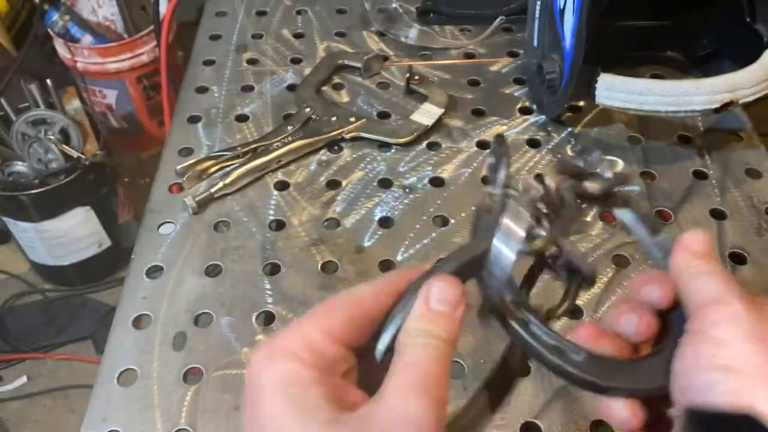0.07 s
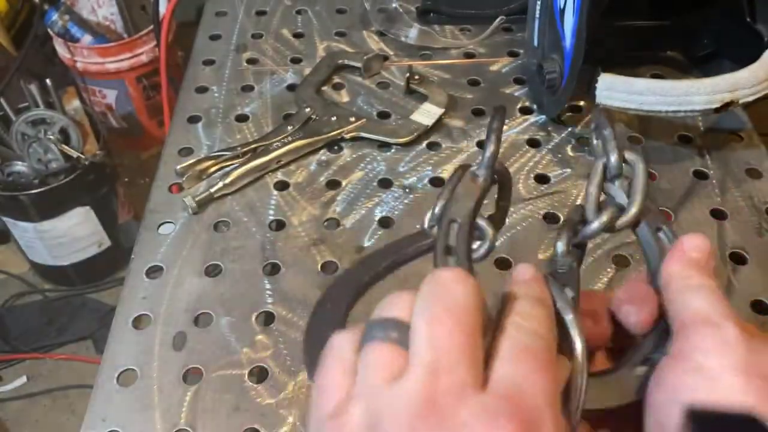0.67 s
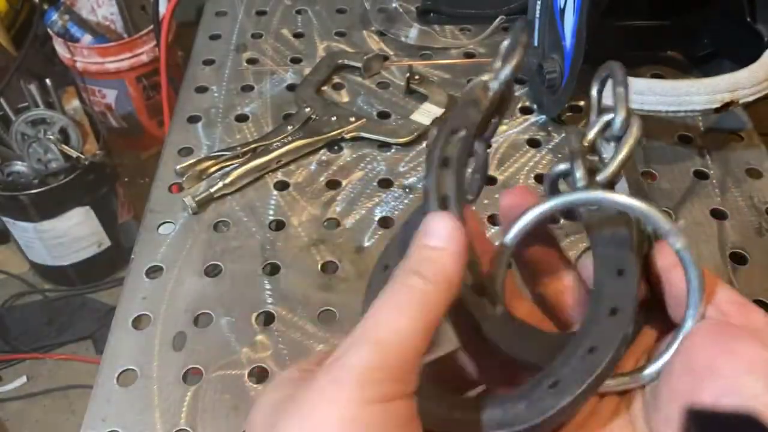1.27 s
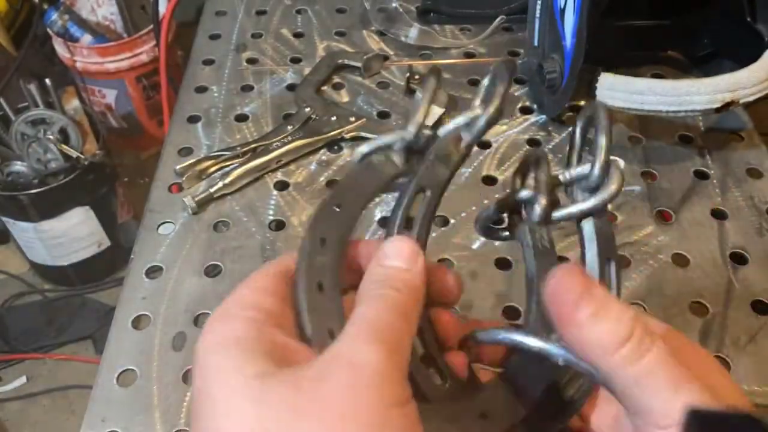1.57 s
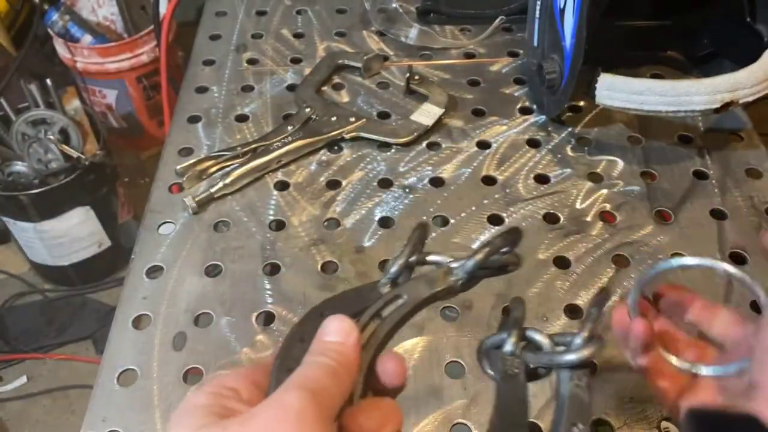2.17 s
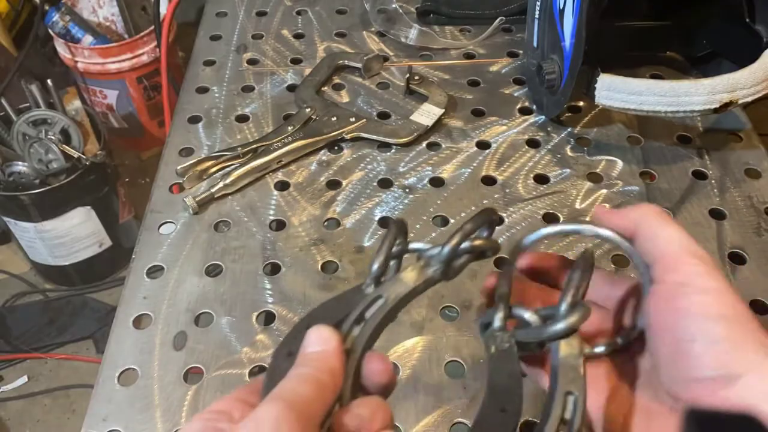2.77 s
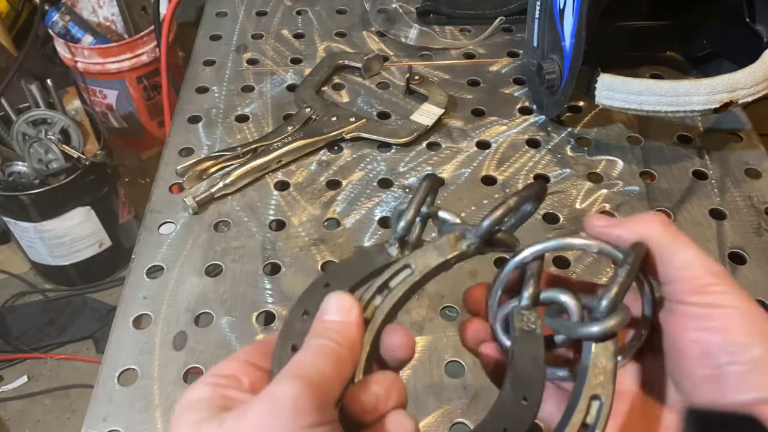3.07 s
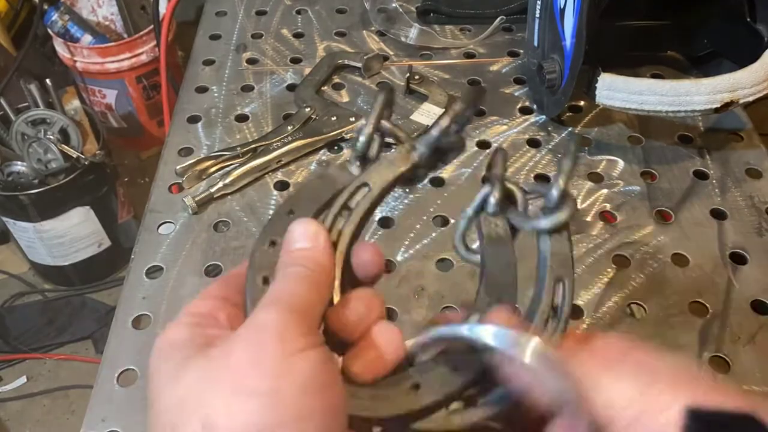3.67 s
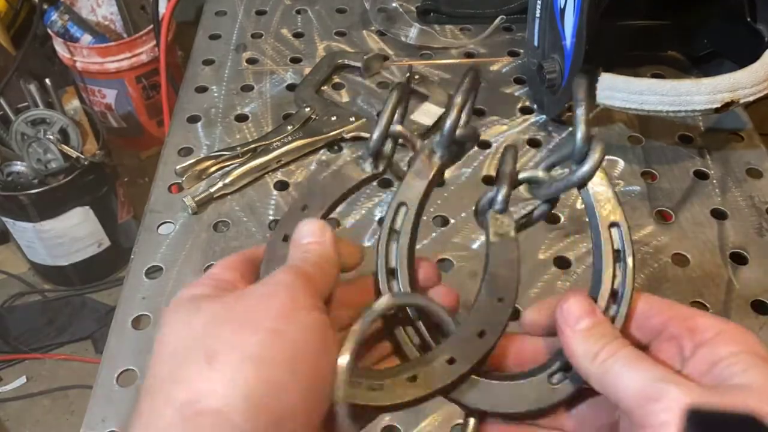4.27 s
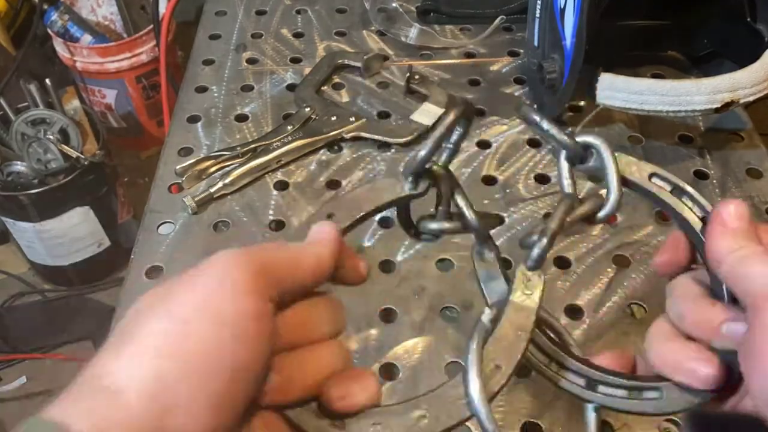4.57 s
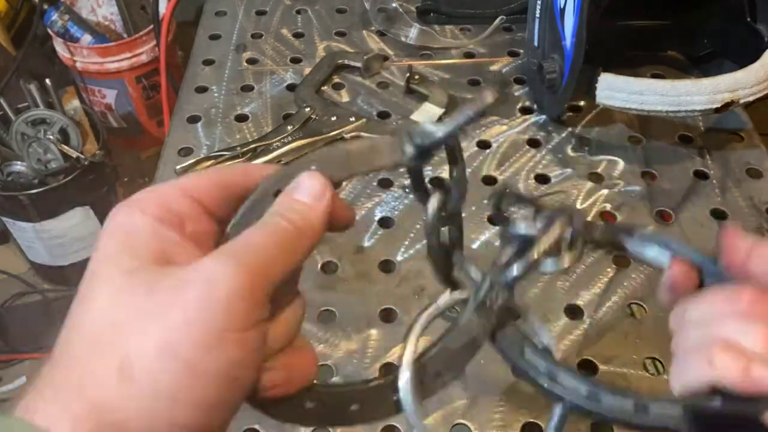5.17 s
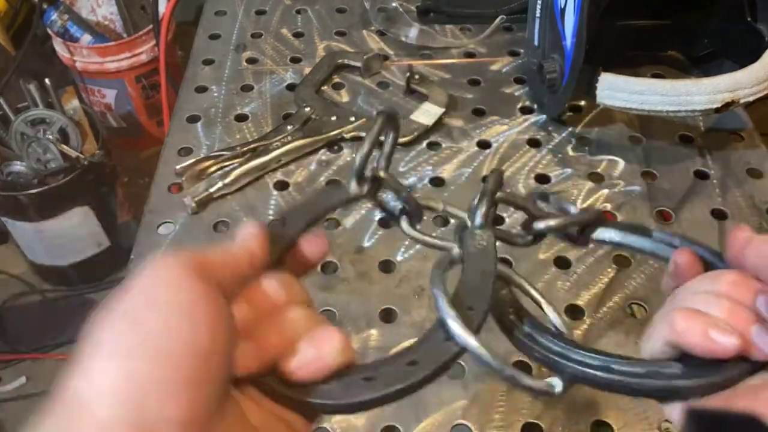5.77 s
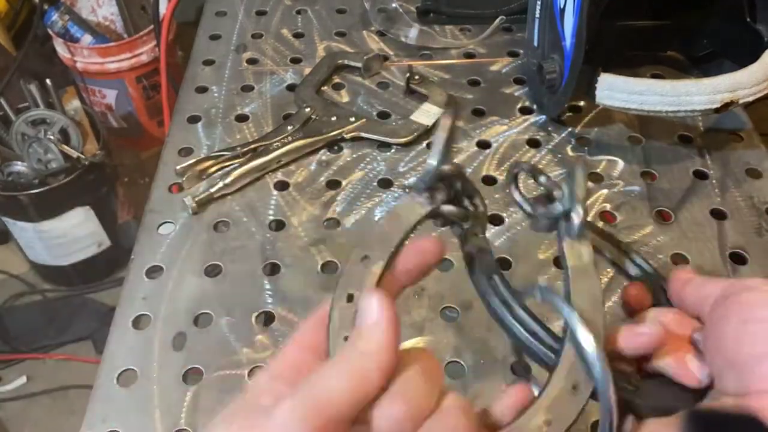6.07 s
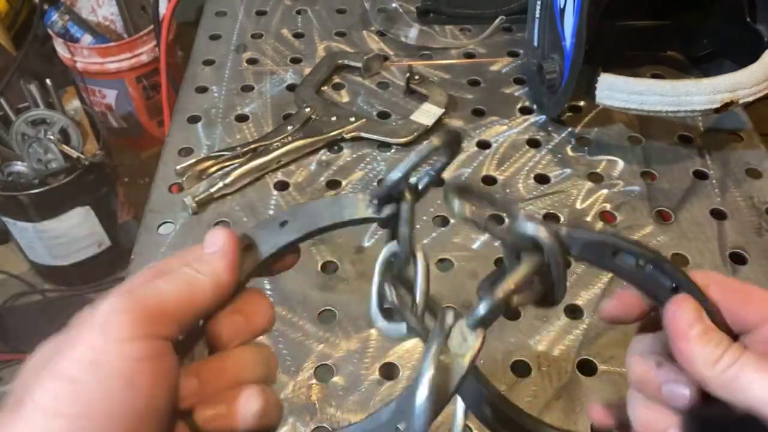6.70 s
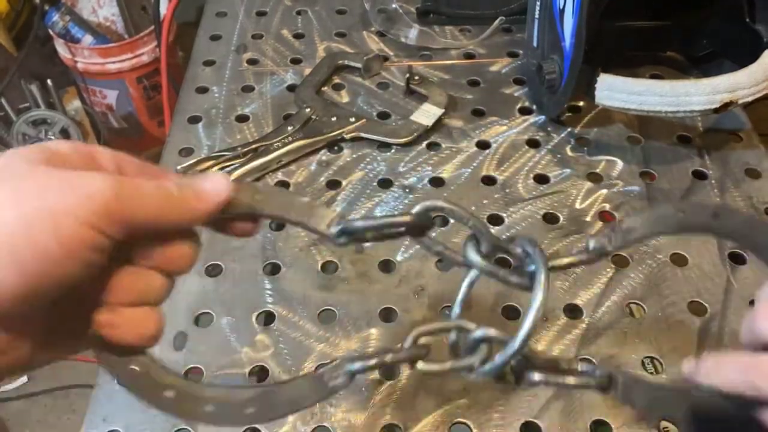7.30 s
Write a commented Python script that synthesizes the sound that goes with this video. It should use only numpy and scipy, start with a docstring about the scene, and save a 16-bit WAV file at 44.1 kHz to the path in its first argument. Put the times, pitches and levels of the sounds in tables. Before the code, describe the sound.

Bright, irregular clinks and brief scrapes of chained horseshoes turned in the hands, growing louder late, with soft air and hum behind.

```python
"""Two steel horseshoes, joined by short chains and carrying a ring, are turned in the hands close by.
The parts clink, bounce and slide on each other. Each hit makes the steel crack and ring,
and the fingers damp it. The chains jerk taut with a dull thud, and a limiter turns everything
down for a moment at the loudest hits. Behind it all, air rushes and a fan hums in the workshop."""
import sys
import numpy as np
from scipy import signal
from scipy.fft import rfft, irfft
from scipy.io import wavfile
from scipy.ndimage import uniform_filter1d, minimum_filter1d

SR = 44100
rng = np.random.default_rng(int(sys.argv[2]) if len(sys.argv) > 2 else 0)


def pcm_store(signal):
    """Save signal as 16-bit PCM."""
    levels = np.round(np.clip(np.atleast_2d(signal), -1, 1) * 32767)
    wavfile.write(sys.argv[1], SR, levels.astype(np.int16).T)


N = 323694
TAIL = 16384  # samples in one dying sound

# Tone colour of the workshop air: pitch_hz, relative_db
AIR_COLOUR = [(26, -18.5), (56, -5), (180, -2.5), (330, -3.5), (560, -9.5), (1050, -14.5), (2100, -20),
              (4100, -25.5), (6500, -26), (8100, -40.5), (11000, -46.5), (12200, -70), (16100, -49.5)]
# How wide the air sounds: pitch_hz, side_minus_mid_db
AIR_WIDTH = [(62, -13.5), (252, -5), (402, -9), (602, 4.5), (1102, 4), (2502, 0)]
# Clinks (harder hits tilt toward the treble): start_s, level_db, tilt_db_per_octave, links_relative_db
CLINK_HITS = [(0.0371, -23, -2.5, -4.5), (0.112, -23, 4, 0), (0.131, -26, 2.5, -14),
              (0.1585, -25.5, 0.5, -6), (0.205, -24, -0.5, -10), (0.26, -29.5, -3.5, 3),
              (0.3215, -23.5, -2, -2), (0.4255, -19.5, -5, -3), (0.5806, -24.5, 8, 13),
              (0.669, -26, 2.5, 0), (0.7266, -32.5, -1, -10), (0.8121, -22, 1.5, -5),
              (0.8444, -30.5, -0.5, 0), (1.037, -14, -1.5, -2.5), (1.3596, -30.5, 2, -10),
              (1.3869, -20.5, .5, -8.5), (1.5323, -25, -2.5, -14), (1.7613, -35, -2, -15),
              (1.861, -20, 3.5, -17), (1.8877, -20.5, 4, 8.5), (1.9352, -32, -2.5, -18),
              (2.0261, -25.5, -0.5, -17), (2.8157, -17.5, 5.5, -6.5), (2.851, -21.5, 2, 2),
              (2.9242, -38.5, .5, -22), (3.079, -31, 4.5, 1), (3.138, -34, 3.5, -23),
              (3.1656, -28.5, 4.5, -9), (3.3553, -38.5, -6, -12), (3.4406, -40, -2, -15),
              (3.6212, -32, -3.5, -5), (3.7042, -16.5, 0, -5), (3.9833, -34, -5.5, -16),
              (4.2177, -31.5, -2, -17), (4.3407, -17.5, 5, -6), (4.4209, -16.5, 5.5, -5),
              (4.5262, -28.5, -3.5, 1), (4.6158, -30, -5, -16), (4.7992, -35, -9, -17),
              (4.929, -42.5, -1, -12), (5.0146, -29, -8, -6), (5.046, -17.5, -1.5, -9),
              (5.072, -12, -5, -3.5), (5.1717, -14.5, -2, -2.5), (5.2, -24.5, -1.5, 3),
              (5.301, -31.5, -7.5, -16), (5.436, -28, -4, -9), (5.554, -25.5, -2.5, 6),
              (5.602, -23.5, -4.5, -5), (5.669, -18, 2.5, 2.5), (5.742, -25, 3, -12), (5.7773, -22.5, 5, 2),
              (5.809, -27, -1.5, -19), (5.879, -17, .5, -3), (5.995, -31, 0, -7),
              (6.0569, -30.5, -1.5, 1.5), (6.113, -23, -1.5, -10), (6.179, -19, 0, -7.5),
              (6.2047, -8.5, -2, 5), (6.6227, -24.5, 2, -6), (6.6889, -22, -3.5, -17),
              (6.7384, -19.5, 0.5, -8), (6.854, -24.5, -2.5, -8), (6.8785, -13, 0, -2),
              (6.9094, -6.5, 0.5, -2.5), (6.9508, -7.5, 1, 8.5), (7.0001, -6, 2, -1), (7.2626, -37, -1, -9)]
# Steel sliding on steel: start_s, end_s, level_db, tilt_db_per_octave, links_relative_db
SLIDE_STROKES = [(0.421, 0.7, -31.5, -5.5, -2), (0.471, 0.537, -25, -1, 8.5),
                 (0.931, 0.975, -43.5, -3.5, -14), (1.611, 1.676, -36, 2.5, 0.5),
                 (1.783, 1.836, -30.5, -0.5, -9), (2.03, 2.116, -37.5, -2.5, -2),
                 (4.357, 4.513, -33.5, -2.2, 0), (4.634, 4.686, -42, -11, -24), (5.012, 5.2, -29, -2.5, -3),
                 (5.683, 5.867, -36.5, -4, 8), (6.121, 6.232, -31, -5, -9), (6.651, 6.842, -32.5, 4.5, 5),
                 (6.879, 7.061, -20, -0.5, 3)]
# The notes that each steel part rings with: pitch_hz, relative_db
RING_NOTES = [(2322, 4), (2432, 11.5), (2542, 0.5), (5342, -6.5), (6953, 9.5), (7793, 15), (7943, -3),
              (8546, -1), (9666, 10), (11001, -6)]
FIRST_SHOE_NOTES = [(2090, -3), (2779, -7), (2902, -5.5), (3815, -3.5), (4352, -2.5), (4777, -4), (5424, 5),
                    (5589, -4.5), (6952, 4), (7752, -5.5), (9417, 5.5), (9652, 8.5), (10682, -8)]
SECOND_SHOE_NOTES = [(2554, -9.5), (3730, 4), (4416, 5.5), (4758, 7.5), (5603, 2.5), (6696, 4.5), (7377, 6),
                     (7492, -22.5), (8227, -23.5), (8747, -6), (9394, -2.5), (9952, -0.5), (10402, -12),
                     (11032, -3.5)]
LINK_NOTES = [(13357, -13.5), (13610, -1), (13714, 0.5), (13877, -1.5), (14623, 6.5), (14782, -9.5),
              (14878, -10.5)]
# Tone colour of the short crack of a hit, on the large parts and on the links: pitch_hz, relative_db
BODY_CRACK_COLOUR = [(320, -26), (1220, -14), (1770, -14), (2420, -3.5), (3320, -4.5), (4620, 5.5),
                     (6220, -1.5), (7220, -0.5), (11020, 1.5), (12020, -31.5), (16020, -41)]
LINK_CRACK_COLOUR = [(11600, -51), (13020, -29), (13720, -9), (14920, 5.5), (15620, -21.5), (16420, -40)]
# Which part is hit: time_s, part (0 ring, 1 first shoe, 2 second shoe, in between = both)
STRUCK_PART = [(0.15, 0.39), (0.66, .5), (0.8, 1.48), (1.53, 1.7), (1.82, 1.06), (2.05, 0.61), (2.82, 0.92),
               (3.08, .4), (3.7, 0.99), (4.42, 1.31), (4.53, 2), (5.05, 1.5), (5.43, 1.68), (5.66, 0.74),
               (5.76, 1.58), (5.9, 1.38), (6.85, 1.65), (7.05, 1.56)]
# How long the fingers let the steel ring, until it is 60 dB down: time_s, ring_s
FINGER_GRIP = [(0.048, 0.059), (0.42, 0.2), (0.8, 0.073), (1.4, 0.17), (1.9, 0.039), (2.051, 0.24),
               (2.85, 0.08), (3.16, 0.023), (3.4, 0.15), (3.72, 0.071), (4.42, 0.11), (4.56, 0.012),
               (5.43, 0.036), (5.6, 0.12), (6.05, 0.023), (6.9, 0.13), (7.26, 0.0093)]


def amp(db):
    """Turn decibels into a gain."""
    return 10 ** (np.asarray(db) / 20)


def unit_level(x):
    """Scale a sound to an average power of 1."""
    return x / np.sqrt(np.mean(x ** 2) + 1e-20)


def curve_at(points, hz):
    """Read a spectrum between its points, along a log pitch scale."""
    pitch_hz, db = np.transpose(points)
    return np.interp(np.log(hz + 1), np.log(pitch_hz + 1), db)


def add(mix, start_s, sound):
    """Mix a sound in at its start time."""
    part = mix[:, max(round(start_s * SR), 0):][:, :sound.shape[1]]
    part += sound[:, :part.shape[1]]


def noise(db, size):
    """Two unrelated channels of noise with the spectrum db."""
    return irfft(rfft(rng.standard_normal((2, size))) * amp(db), size)


def fade(ring_s):
    """A fade that falls 60 dB in ring_s seconds."""
    return amp(-60 * np.arange(TAIL) / SR / max(ring_s, 1e-3))


def workshop_air(level_db=-48):
    """Air makes a soft, wide rush: mid is what both ears share, side is how they differ."""
    hz = np.fft.rfftfreq(N, 1 / SR)
    mid, side = noise(curve_at(AIR_COLOUR, hz), N)
    side = irfft(rfft(side) * amp(curve_at(AIR_WIDTH, hz)), N)
    return amp(level_db) * np.array([mid + side, mid - side]) / mid.std()


def fan(pitch_hz=398.3, level_db=-49, waver=0.047, drift_hz=4, stereo_shift_rad=0.98):
    """Turning fan blades hum one slightly wavering note."""
    hz = np.fft.rfftfreq(N, 1 / SR)
    drift = unit_level(noise(-20 * np.log10(1 + (hz / drift_hz) ** 2), N))
    phase = 2 * np.pi * pitch_hz * np.arange(N) / SR + waver * drift[0]
    loudness = amp(level_db) * np.sqrt(2) * (1 + waver * drift[1])
    return loudness * np.sin([phase, phase + stereo_shift_rad])


def steel(notes):
    """Steel vibrates at its own notes: their pitches, levels and never-fading waves."""
    hz, db = np.transpose(notes)
    return hz, db, np.exp(2j * np.pi * hz[:, None] * np.arange(TAIL) / SR)


def hands(time_s):
    """The hands decide which part is hit and how long it rings."""
    return [np.interp(time_s, *np.transpose(curve)) for curve in (STRUCK_PART, FINGER_GRIP)]


def strike(metal, weight_db, crack_colour, tilt, ring_s, crack_db, spread_rad, after_db, free_ring_s=0.32):
    """Struck steel gives a noisy crack, notes damped by the fingers, and a faint free after-ring."""
    hz, db, waves = metal
    uneven_db = 2.2 * rng.standard_normal((2, len(hz)))
    # each note spreads in its own pattern, so it reaches left and right out of step
    phase = 2 * np.pi * rng.random(len(hz)) + spread_rad * rng.standard_normal((2, len(hz)))
    spot_db = 7.0 * rng.standard_normal(len(hz))  # the spot that is hit favours some notes
    gain = amp(db + weight_db + tilt * np.log2(hz / 6000) + uneven_db + spot_db)
    tone = unit_level(((gain * np.exp(1j * phase)) @ waves).real)
    # touching parts load each other, which shifts the pitch a little
    n = np.arange(TAIL)
    detuned = n * (1 + 0.0037 * rng.standard_normal())
    tone = np.array([np.interp(detuned, n, channel) for channel in tone])
    ringing = tone * (fade(ring_s) + amp(after_db) * fade(free_ring_s))
    crack_hz = np.fft.rfftfreq(TAIL, 1 / SR)
    hardness_db = tilt * np.log2(np.maximum(crack_hz, 1900) / 6000)
    crack = noise(curve_at(crack_colour, crack_hz) + hardness_db, TAIL)
    crack = unit_level(crack + 0.055 * crack[::-1]) * fade(1.26 * ring_s)  # left and right blend a little
    swell = 1 - np.exp(-n / SR / 0.00028)  # the vibration spreads through the steel
    return swell * (ringing + amp(crack_db) * crack)


def contact(parts, force, energy, tilt, link_db, part, ring_s, neighbour_db=-24.5):
    """A force shakes the struck part, its neighbours more weakly, and the chain links."""
    large, links, part_of_note = parts
    weight_db = neighbour_db * abs(part_of_note - np.clip(part, 0, 2))
    body = strike(large, weight_db, BODY_CRACK_COLOUR, tilt, ring_s,
                  crack_db=-4.5, spread_rad=1.0, after_db=-58.5)
    chain = strike(links, 0, LINK_CRACK_COLOUR, 0, ring_s, crack_db=-19.0, spread_rad=0.7, after_db=-48)
    body, chain = (unit_level(signal.fftconvolve(x, force[None], axes=1)) for x in (body, chain))
    return np.sqrt(energy * SR / body.shape[1]) * (body + amp(link_db) * chain)


def clinks(parts, bounce=0.44, bounce_s=0.005, bounces=3, graze=0.11, graze_s=0.0037, blow_s=0.0072):
    """The parts graze, hit and bounce a few times, and ring as long as the fingers allow."""
    out = np.zeros((2, N))
    for start_s, level_db, tilt, link_db in CLINK_HITS:
        gaps_s = np.r_[graze_s, bounce_s * (0.5 + rng.random(bounces))]  # the hit, then its bounces
        force = np.zeros(SR // 20)
        hits = np.clip(np.cumsum(gaps_s) * SR, 1, len(force) - 1).astype(int)
        force[hits] = bounce ** np.arange(len(hits))
        force[0] = graze
        energy = amp(level_db) ** 2 * blow_s  # as if the level were held for blow_s
        add(out, start_s - graze_s, contact(parts, force, energy, tilt, link_db, *hands(start_s)))
    return out


def loose_links(parts, level_db=-48, ring_s=0.11, count=20):
    """Loose links touch the other parts faintly at random moments."""
    out = np.zeros((2, N))
    for when, which, strength in rng.random((count, 3)):
        energy = strength * amp(level_db) ** 2 * ring_s / np.log(1e6)  # summed over the fade
        touch = contact(parts, np.ones(1), energy, tilt=0, link_db=-8, part=2 * which, ring_s=ring_s)
        add(out, when * N / SR, touch)
    return out


def slides(parts, slips_per_s=330, scatter_db=4.0, ring_s=0.031):
    """Sliding steel catches and slips in many tiny hits that swell and fade with the stroke."""
    out = np.zeros((2, N))
    for start_s, end_s, level_db, tilt, link_db in SLIDE_STROKES:
        part, _ = hands((start_s + end_s) / 2)
        length = int(np.clip((end_s - start_s) * SR, SR // 100, SR))
        slips = rng.random(SR)[:length] < slips_per_s / SR
        strength = amp(scatter_db * rng.standard_normal(SR)[:length])
        force = slips * strength * np.sqrt(np.hanning(length))
        energy = amp(level_db) ** 2 * length / SR * 2 / np.pi
        add(out, start_s, contact(parts, force, energy, tilt, link_db, part, ring_s))
    return out


def chain_jerk(start_s=6.213, pitch_hz=86, level_db=-18, ring_s=0.059):
    """The chain snaps taut and the hands take a dull thud."""
    out = np.zeros((2, N))
    thud = amp(level_db) * np.sin(2 * np.pi * pitch_hz * np.arange(TAIL) / SR) * fade(ring_s)
    add(out, start_s, np.array([thud, thud]))
    return out


def room_echo(sound, ring_s=0.19, build_s=0.022):
    """The room adds a short wash of echoes, duller than the sound and different on each side."""
    t = np.arange(TAIL) / SR
    colour_db = curve_at([(4200, 2), (14200, -4.0)], np.fft.rfftfreq(TAIL, 1 / SR))
    build_up = 1 - np.exp(-(t / build_s) ** 2)
    echoes = unit_level(noise(colour_db, TAIL) * fade(ring_s) * build_up)
    return signal.fftconvolve(sound, echoes / np.sqrt(TAIL), axes=1)[:, :N]


def scene():
    """Mix the steel, its echo, the thud, the air and the fan."""
    large = [RING_NOTES, FIRST_SHOE_NOTES, SECOND_SHOE_NOTES]
    part_of_note = np.concatenate([np.full(len(notes), part) for part, notes in enumerate(large)])
    parts = steel(np.concatenate(large)), steel(LINK_NOTES), part_of_note
    metal = clinks(parts) + slides(parts) + loose_links(parts)
    direct = metal * amp([[0.4], [-0.4]])  # a little to the left
    return direct + amp(-15.5) * room_echo(metal) + chain_jerk() + workshop_air() + fan()


def record(dry, limit_db=-17.0, hold_s=0.12, recover_db_per_s=110, cutoff_hz=16300):
    """A limiter turns loud moments down at once, holds and recovers; then the top treble is cut."""
    power = uniform_filter1d((dry ** 2).mean(0), size=440)
    over_db = np.maximum(10 * np.log10(abs(power) + 1e-12) - limit_db, 0)
    half_hold = int(hold_s * SR / 2)
    held_db = -minimum_filter1d(-over_db, 2 * half_hold + 1, origin=half_hold)  # the latest peak
    recovery_db = np.arange(N) * recover_db_per_s / SR
    cut_db = np.maximum.accumulate(held_db + recovery_db) - recovery_db
    limited = dry / amp(uniform_filter1d(cut_db, size=200))
    lowpass = signal.firwin(511, cutoff_hz, window=("kaiser", 9), fs=SR)
    return signal.oaconvolve(limited, lowpass[None], "same", axes=1)


dry = scene()
out = record(dry)
pcm_store(out)
```